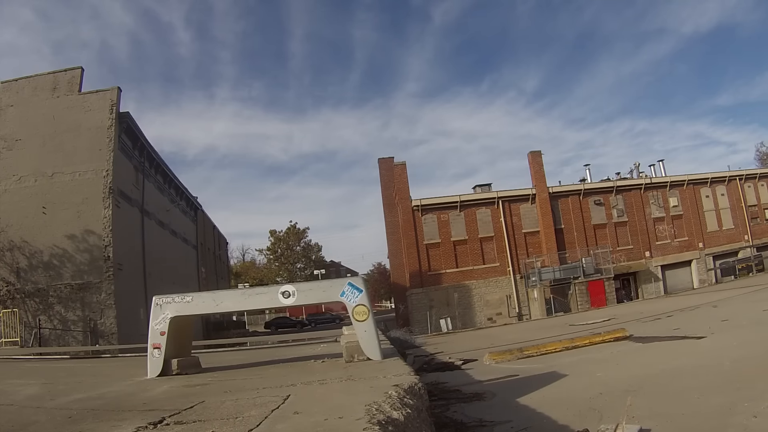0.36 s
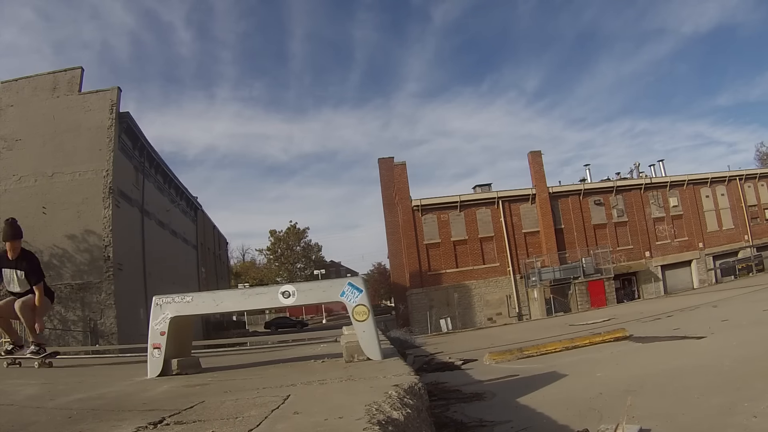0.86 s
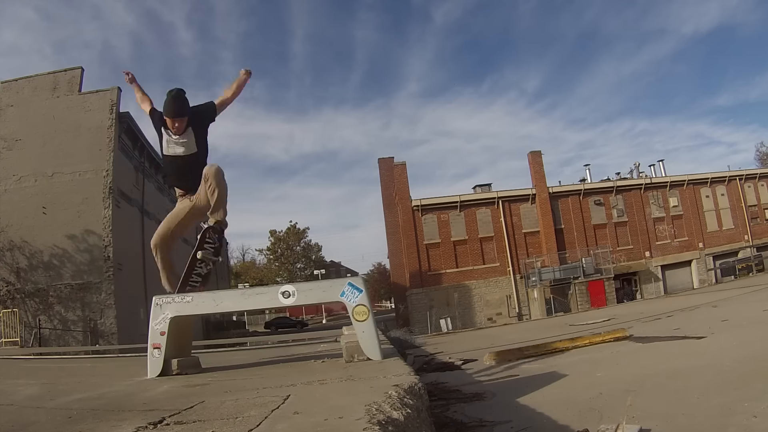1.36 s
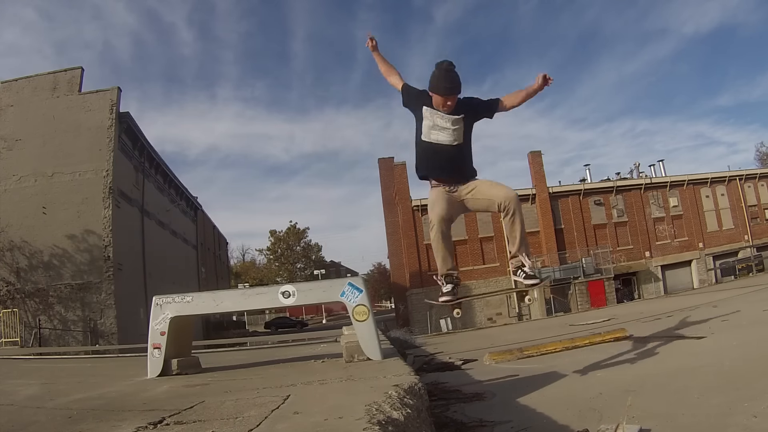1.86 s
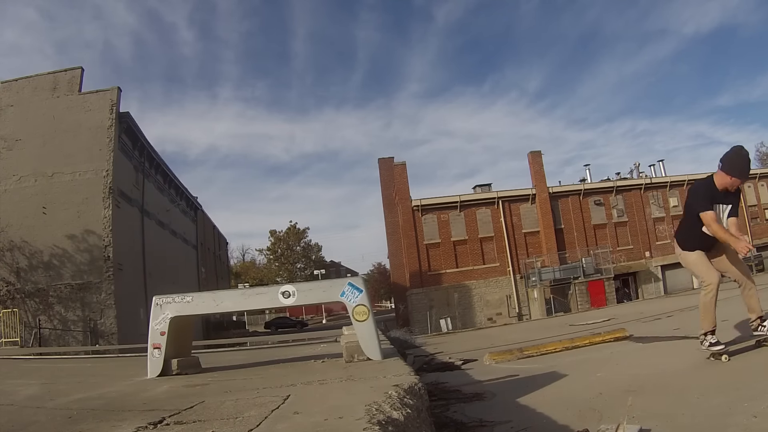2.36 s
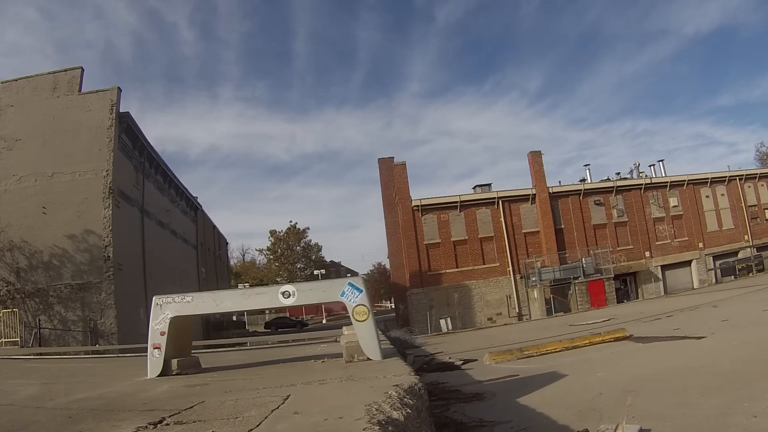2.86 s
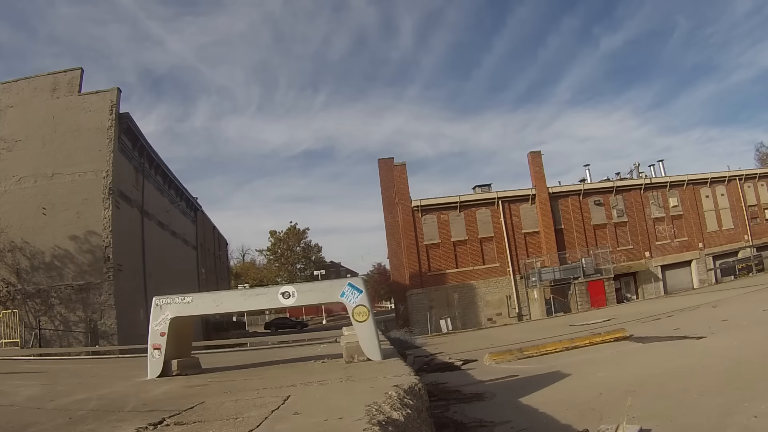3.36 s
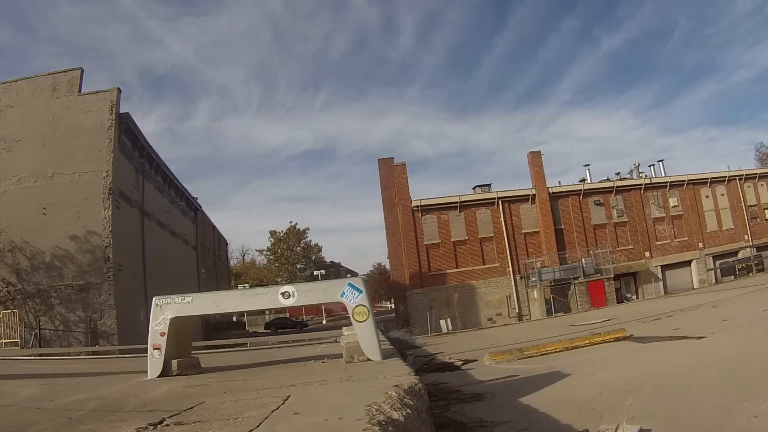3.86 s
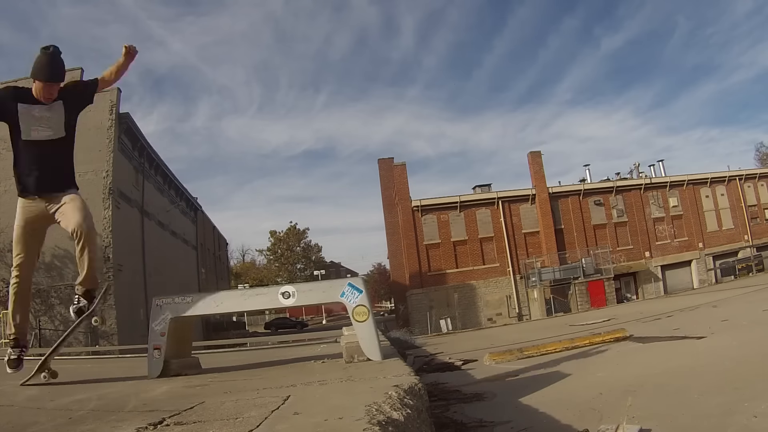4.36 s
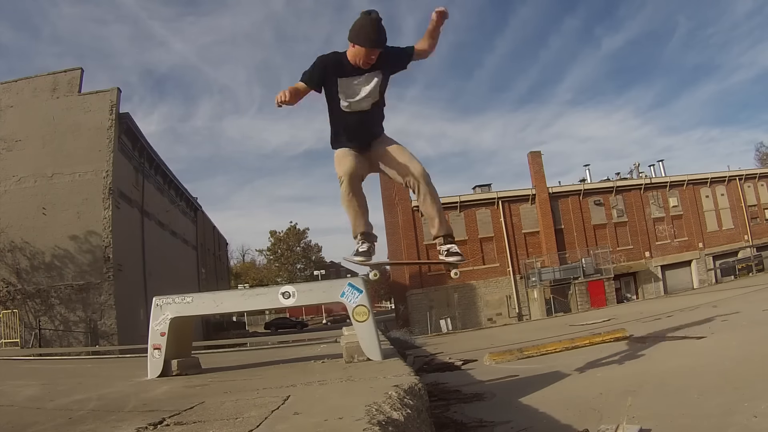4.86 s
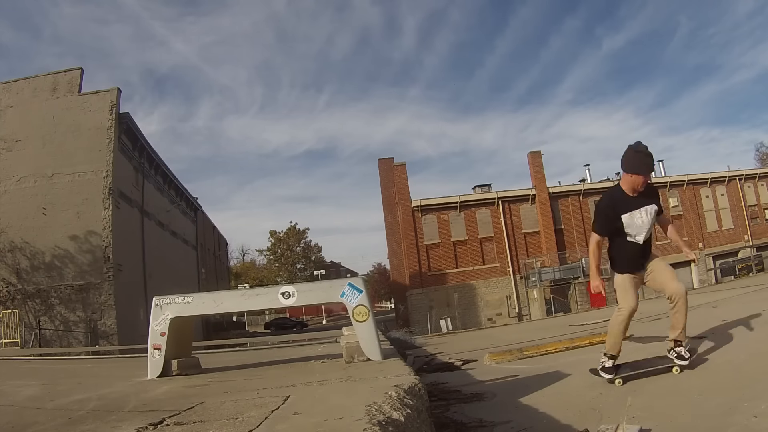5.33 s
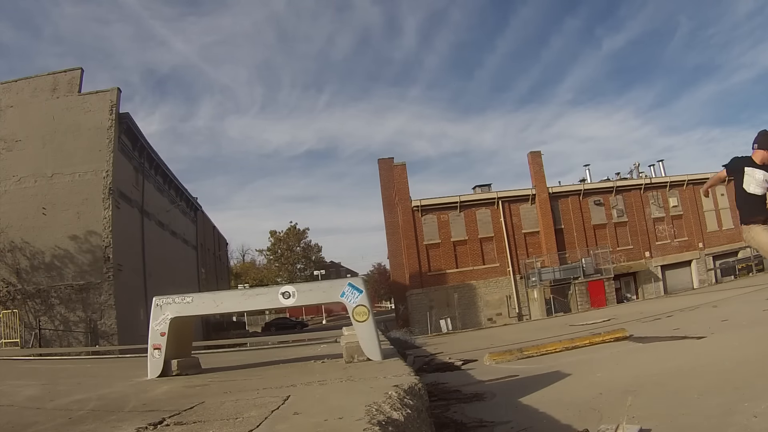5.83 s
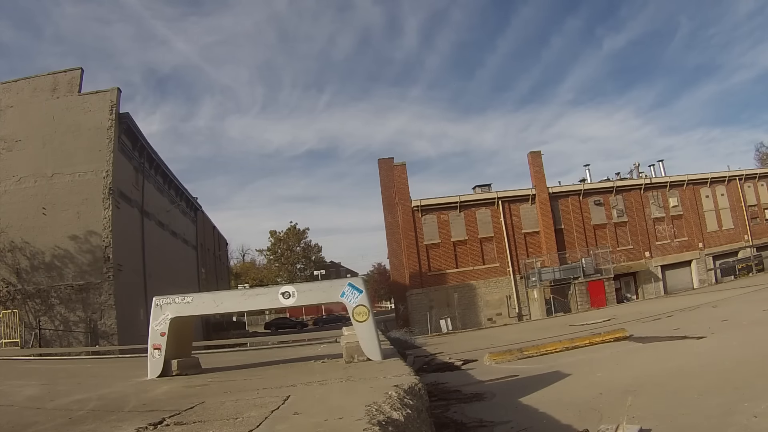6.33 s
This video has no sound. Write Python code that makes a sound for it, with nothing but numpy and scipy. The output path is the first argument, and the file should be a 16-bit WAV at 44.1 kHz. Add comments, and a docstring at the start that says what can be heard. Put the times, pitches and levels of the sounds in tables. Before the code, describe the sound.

Steady wheel rumble and bearing grit over distant traffic hum and low wind rumble. The board snaps, chatters woodenly across a ledge and cracks down on the ground. After a sudden cut, an engine idles behind louder rolling; the board snaps again, slams the ledge, lands twice in quick succession and rolls on. Dull short echoes, a muffled close microphone, and background dipping after the loudest blows.

```python
"""A skateboard on rough concrete in an open lot, two passes: it rolls, pops onto a ledge, lands and rolls off.
Random bumps drive deck drone and bearing grit; blows ring damped modes of deck, trucks and tail, with dull
echoes. Also close by: noise bursts, truck ticks, a faint falling whistle. Far off, town noise and hum; low
wind rumble; in the second pass an idling engine of wavering sines and noise puffs. One microphone in a closed
case hears it boxy, dull and nearly mono; gain control dips the background after loud blows."""
import sys
import numpy as np
from scipy import signal
from scipy.fft import rfft, irfft
from scipy.io import wavfile
from scipy.ndimage import uniform_filter1d, minimum_filter1d

SR = 44100
rng = np.random.default_rng(int(sys.argv[2]) if len(sys.argv) > 2 else 0)


def transcribe(u):
    """Save the signal u as a 16-bit wav file named by the first command-line argument.

    u: samples, shape (n,) or (channels, n), limited to [-1, 1]; the rate is SR.
    q: integer samples, one column per channel.
    """
    v = np.clip(np.atleast_2d(u).T, -1, 1)
    q = np.round(v * 32767).astype(np.int16)
    wavfile.write(sys.argv[1], SR, q)


def ratio(d):
    """dB to gain"""
    e = np.asarray(d, float) / 20
    return 10 ** e


N = 295911

# Far traffic noise: (frequency [Hz], relative density [dB per Hz])
TOWN_SPECTRUM = [(15, -47.5), (40, -14), (70, 1.5), (113, 1.5), (146, -1.5), (174, -4), (360, -0.5),
                 (400, 1.5), (520, -36), (880, -120)]
# Lumpy low rumble, perhaps wind on the microphone case: (time [s], level [dB])
WIND_LEVEL = [(0, -45.5), (1.4, -38), (1.8, -47), (2.8, -39), (3.4, -42), (4.6, -43.5), (5.2, -67.5),
              (5.7, -40), (6.71, -38)]
# Idling engine, overall: (time [s], level [dB])
ENGINE_LEVEL = [(3.33, -21.5), (3.5, -23), (3.57, -22), (3.72, -19), (3.9, -24), (3.97, -22), (4.1, -23.5),
                (4.4, -22.5), (4.72, -32.5), (5.2, -27), (5.6, -35), (5.95, -28.5), (6.3, -24.5),
                (6.71, -26)]
# Engine orders: (multiple of firing rate [1], relative level [dB])
ENGINE_ORDERS = [(4, -14), (5, 1), (7, -13), (9, -5), (10, -11), (12, -9), (15, -12), (16, -12)]
# Wander of the engine's fifth order: (time [s], spread [Hz])
ENGINE_HUNT = [(3.33, 4.0), (3.55, .5), (4.5, .7), (5.9, 3.0), (6.71, 8.0)]
# Exhaust noise: (frequency [Hz], relative density [dB per Hz])
EXHAUST_SPECTRUM = [(35, -31), (60, -25), (113, 1), (172, -8), (206, 0), (239, -8), (274, 1), (648, -17.5),
                    (900, -30.5), (1170, -48), (1980, -120)]
# Falling whistle in two notes:
# (start [s], length [s], from frequency [Hz], to frequency [Hz], relative level [dB])
WHISTLE_NOTES = [(3.0, .205, 1645, 1495, -40.5), (3.225, .095, 1420, 1395, -45)]
# Drone of the wheels on concrete, before gain control: (time [s], level [dB])
ROLL_LEVEL = [(0.0, -28), (0.65, -26.5), (0.95, -26), (1.3, -25.5), (1.55, -27.5), (1.8, -28.5), (2.0, -29),
              (2.5, -27.5), (2.8, -26), (3.3, -27.5), (3.33, -24.5), (3.9, -24), (4.35, -22), (4.7, -25),
              (4.85, -18.5), (5.05, -26.5), (5.5, -27), (6.2, -26), (6.71, -26)]
# Deck drone under the rolling wheels: (frequency [Hz], relative density [dB per Hz])
DRONE_SPECTRUM = [(110, -20.5), (180, -1), (264, -1), (360, -5.5), (433, 1.5), (490, -1), (634, 1.5),
                  (764, -2), (1270, -24), (1500, -36), (1950, -39.5), (3300, -120)]
# Bearing grit, also mixed into the exhaust: (frequency [Hz], relative density [dB per Hz])
GRIT_SPECTRUM = [(650, -22.5), (1100, -10.5), (1500, -0.5), (2130, -2), (2900, -10), (3700, -13),
                 (4600, -18), (5400, -17.5), (6500, -27.0), (7600, -60), (16000, -90)]
# Loose trucks jiggling on the coarse ground: (time [s], level [dB])
JIGGLE_LEVEL = [(0, -68.5), (1.3, -68), (2.3, -52), (3.3, -65), (3.33, -54), (3.6, -54), (3.9, -49.5),
                (4.05, -56), (4.4, -51.5), (4.75, -48), (5.4, -58.5), (6.2, -67), (6.71, -60)]
# Bursts of coloured noise: scuffs, ticks, bright edges of landings, faint treble puffs:
# (start [s], relative level [dB], centre frequency [Hz], length [s])
NOISE_BURSTS = [(0.395, -55, 5000, 0.04), (0.403, -40, 1610, 0.025), (0.49, -56, 5000, 0.016),
                (0.508, -56, 4900, 0.035), (1.702, -48, 4800, 0.035), (1.713, -41, 4700, 0.012),
                (1.702, -45, 3300, 0.022), (1.702, -51, 6600, .03), (1.747, -55.5, 6400, 0.033),
                (2.1468, -38.5, 9560, .003), (2.15, -46, 9400, 0.036), (2.137, -54, 12600, .025),
                (2.84, -70, 9500, 0.19), (3.07, -72, 8500, .09), (3.285, -65, 8500, .06),
                (3.785, -57, 4700, 0.05), (3.795, -63, 10020, .03), (3.945, -43, 2800, 0.009),
                (3.963, -45, 2800, .01), (3.9, -54, 2700, .12), (4.527, -42, 5800, .005),
                (5.3028, -33, 4300, .006), (5.324, -56, 11750, 0.04), (5.333, -41, 4300, 0.03),
                (5.76, -60, 5130, 0.05), (5.774, -65.5, 11030, 0.046), (6.323, -68, 9470, 0.14),
                (6.407, -52, 4780, 0.01)]
# The tail snaps on the ground: (time [s], relative level [dB])
TAIL_SNAPS = [(1.3886, -17.5), (4.5132, -21)]
# Modes of the tail: (frequency [Hz], relative level [dB], t60 [s])
TAIL_MODES = [(535, 3, .035), (750, 10, .03), (1150, -5, .025), (1450, 1, .03), (1840, -3, .03),
              (2420, -9, .02), (3080, -2, .018), (3500, 0, .016), (4560, -3, .02), (5690, -8, .02),
              (6250, -13, .015)]
# Blows of board on ledge and ground: (time [s], relative deck level [dB],
# relative crack level [dB], chatter length [s], centre of deck ring [Hz])
BLOWS = [(0.389, -7, -45, 0.011, 600), (0.407, 0, -44, 0.0055, 625), (0.408, -22.5, -48, 0.016, 260),
         (0.491, -6.5, -39.5, 0.0021, 460), (0.507, -5.5, -42, 0.0035, 540), (1.149, -5, -50, .001, 680),
         (1.389, -7, -19, 0.011, 560), (1.631, -2.5, -35, 0.01, 750), (1.642, -12, -25, 0.002, 520),
         (1.645, 6.5, -26, 0.0039, 480), (1.66, 6, -31, 0.0036, 566), (1.663, 9, -23.5, 0.009, 580),
         (1.676, 12.5, -24, 0.006, 736), (1.689, 3, -30.5, 0.022, 575), (1.716, -6, -35, 0.013, 627),
         (1.733, -2, -37, 0.0039, 675), (1.786, -9, -46, 0.017, 620), (2.147, 2, -17, 0.0027, 513),
         (2.152, 11.5, -16, 0.0078, 638), (2.168, 1, -18.5, 0.004, 480), (2.176, 1, -26.5, 0.0042, 642),
         (3.315, -11.5, -31.5, 0.0016, 408), (3.333, -22, -53, 0.0046, 420), (3.345, -30, -38, 0.0033, 397),
         (3.576, 1, -35, 0.0012, 457), (3.902, -16, -46, 0.0044, 405), (3.951, -24, -36.5, 0.001, 640),
         (3.967, -16, -42, 0.00075, 637), (4.171, -6, -46, .001, 646), (4.248, -8, -46.5, .001, 650),
         (4.306, -20, -46.5, .001, 650), (4.5135, -2.5, -23.5, 0.014, 640),
         (4.536, -4.5, -30.5, 0.0016, 373), (4.756, 1, -24.5, 0.0012, 760), (4.7588, 9.5, -18, 0.0011, 730),
         (4.7628, 19.5, -13.5, 0.0011, 650), (4.773, 5.5, -27, 0.017, 740), (4.805, 2.5, -30.5, 0.02, 650),
         (5.3028, 10.5, -17.5, 0.0059, 507), (5.332, 9.5, -17.5, 0.0066, 680),
         (5.355, -2, -28.5, 0.0056, 493)]
# Modes of the deck: (frequency [Hz], relative level [dB], t60 [s])
DECK_MODES = [(405, 3.5, 0.016), (490, -6.5, 0.012), (550, 4.5, 0.016), (680, -7, 0.045),
              (758.6, -7, 0.052), (890, 5.5, 0.0074), (1080, -9, 0.045), (1130, -10, 0.042)]
# Modes of axles and bolts, before any detuning: (frequency [Hz], relative level [dB], t60 [s])
TRUCK_MODES = [(1430, 0, 0.012), (1860, 3, 0.012), (2380, 2, 0.009), (2950, -1, 0.006), (4130, -3, 0.007),
               (4650, -2, 0.007), (5400, 0.5, 0.0035), (6550, -1, 0.0027), (7760, -4.5, 0.004),
               (10500, -17.5, 0.0018)]
# Modes of the low thud: (frequency [Hz], relative level [dB], t60 [s])
THUD_MODES = [(191.7, -9, 0.14), (244, 1.5, 0.029), (306, -3.5, 0.088)]
# Each blow rings the trucks in one of three tunings, drawn at random: (frequency factor [1])
TRUCK_TUNINGS = [.93, 1, 1.07]

SECOND_PASS_S, STEP_S = 3.318, .008   # the second pass starts abruptly; time a level takes to step
TOWN_DB, TOWN_SECOND_DB = -32, -29   # traffic noise in the first and second pass
HUM_HZ, HUM_DB, HUM_STEP_S, HUM_AFTER_DB = 148.8, -32.5, 4.2, -33.5   # upper hum line; steps 1 dB lower
FIFTH_HZ, SAG_HZ_PER_S = 114.3, .6   # fifth engine order at the start of the second pass, and its sag
GRIT_DB, GRIT_FOLLOWS, ROLL_MEAN_DB = -49, 1.13, -26   # grit at mean roll; its share of the drone's swing
JIGGLES_PER_S = 700.0   # middle rate of the truck ticks
TOUCHES, TOUCH_S = 10, .0045   # touches in a blow and their spacing
DECK_LOSS_DB, CRACK_LOSS_DB = 0.3, 5.5   # loss per touch
CRACK_HZ = 1800   # centre of the trucks' rattle
THUD_DB, THUD_PER_OCTAVE_DB = -20.5, 21.5   # thud under a ring at 600 Hz; lower rings thud more
LIMIT_DB, ATTACK_S, HOLD_S, RELEASE_DB_PER_S = -6.5, 0.0011, .065, 10.5   # gain control


def in_time(rows):
    """Columns joined by straight lines, one value per sample."""
    s, *columns = np.transpose(rows)
    return [np.interp(np.arange(N) / SR, s, c) for c in columns]


def step(at_s, before_db, after_db):
    """One level, then quickly another."""
    return np.interp(np.arange(N) / SR, [at_s, at_s + STEP_S], [before_db, after_db])


def rms_one(x):
    """Scale to rms 1."""
    return x / np.sqrt(np.mean(x ** 2) + 1e-20)


def drift(rate_hz):
    """Slow random wander of spread 1: low-passed noise, drawn every 40 samples."""
    r = np.exp(-2 * np.pi * rate_hz * 40 / SR)
    noise = rng.standard_normal(N // 40 + 2002)
    slow = signal.lfilter([1], [1, -2 * r, r * r], noise)[2000:]
    return np.interp(np.arange(N) / 40, np.arange(len(slow)), rms_one(slow))


def colour(x, spectrum):
    """Weight a signal by a spectrum of (Hz, dB) points; rms 1."""
    hz, db = np.transpose(spectrum)
    bins_hz = np.fft.rfftfreq(N, 1 / SR) + 1
    weight = ratio(np.interp(np.log(bins_hz), np.log(hz), db))
    return rms_one(irfft(rfft(x) * weight, N))


def band(x, low_hz, high_hz):
    """Butterworth band-pass."""
    return signal.sosfilt(signal.butter(2, [low_hz, high_hz], "band", fs=SR, output="sos"), x)


def ring(force, hz, t60):
    """A damped resonator: a unit click sets a sine of height 1 ringing."""
    r, w = ratio(-60 / (t60 * SR)), 2 * np.pi * hz / SR
    return signal.lfilter([0, np.sin(w)], [1, -2 * r * np.cos(w), r * r], force + 1e-18)


def strike(times, sizes, modes, pushes):
    """Every blow pushes every mode with a size and sense of its own."""
    out = np.zeros(N)
    for m, (hz, mode_db, t60) in enumerate(modes):
        force = np.zeros(N + pushes.shape[1])
        for at, size, push in zip(np.round(times * SR).astype(int), sizes[:, m], pushes):
            force[at:at + len(push)] += size * push
        out += ratio(mode_db) * ring(force[:N], hz, t60)
    return out


def town():
    """Far traffic noise with two slightly wavering hum lines an octave apart."""
    low_turn = np.pi * np.cumsum(HUM_HZ + 0.71 * drift(1.8)) / SR
    waver = drift(2.5)
    hum_db = step(HUM_STEP_S, HUM_DB, HUM_AFTER_DB) + 1.5 * waver
    low_line = ratio(-4.5 + 2.75 * waver) * np.sin(low_turn)
    hum = ratio(hum_db) * (np.sin(2 * low_turn) + low_line)
    traffic_db = step(SECOND_PASS_S, TOWN_DB, TOWN_SECOND_DB)
    return ratio(traffic_db) * colour(rng.standard_normal(N), TOWN_SPECTRUM) + hum


def wind():
    """Lumpy low rumble: noise in a narrow band around 24 to 56 Hz."""
    rumble = band(band(rng.standard_normal(N), 36.0, 52.0), 24.0, 56.0)
    return ratio(in_time(WIND_LEVEL)[0]) * rms_one(rumble)


def engine():
    """Low orders as wavering sines, plus a puff of exhaust noise at every firing."""
    since_s = np.arange(N) / SR - SECOND_PASS_S
    fifth_hz = FIFTH_HZ - SAG_HZ_PER_S * since_s + in_time(ENGINE_HUNT)[0] * drift(5.05)
    turn = 2 * np.pi * np.cumsum(fifth_hz / 5) / SR
    orders = np.zeros(N)
    for k, db in ENGINE_ORDERS:
        level = ratio(db - 0.5 + drift(6.0))
        orders += level * np.sin(k * turn + 0.35 * drift(1.1))
    # each puff starts at once and decays through its cycle
    cycle = turn / (2 * np.pi) % 1
    puffs = np.exp(-cycle / 1.1) * ratio(0.47 * drift(7.7)) * rng.standard_normal(N)
    exhaust = ratio(-2.0) * colour(puffs, EXHAUST_SPECTRUM) + ratio(-32.0) * colour(puffs, GRIT_SPECTRUM)
    level_db = in_time(ENGINE_LEVEL)[0] + step(SECOND_PASS_S, -70, 0)
    return ratio(level_db) * (orders + exhaust)


def whistle():
    """A near sine gliding down in each note, its pitch and level slightly unsteady."""
    out = np.zeros(N)
    for s, length, from_hz, to_hz, db in WHISTLE_NOTES:
        part = np.clip((np.arange(N) / SR - s) / length, 0, 1)
        hz = from_hz + (to_hz - from_hz) * part + 3 * drift(15.0)
        swell = np.sin(np.pi * part ** .8) ** .5
        out += ratio(db - 1.5) * swell * np.sin(2 * np.pi * np.cumsum(hz) / SR)
    return out * ratio(1.5 * drift(20.0))


def walls(x):
    """A few dull echoes from the ground, the ledge and the buildings."""
    dull, out = signal.lfilter([.15], [1, -.85], x), np.zeros(N)
    for lag_s, echo_db in [(.012, -13.5), (.027, -13.5), (.052, -27), (.085, -25), (.13, -25), (.19, -40.5)]:
        lag = round(lag_s * SR)
        out[lag:] += ratio(echo_db) * dull[:-lag]
    return out


def noise_bursts():
    """Each scuff, tick, landing edge or puff is a swell of grainy noise in one frequency band."""
    out, t = np.zeros(N), np.arange(int(.2 * SR)) / SR
    shape = (len(NOISE_BURSTS), len(t))
    grains = rng.standard_normal(shape) * rng.exponential(1, shape)
    broken = ratio(4.5 * drift(30.0))   # the level flickers, as when friction catches and slips
    for (s, db, hz, length), grain in zip(NOISE_BURSTS, grains):
        at = round(s * SR)
        swell = np.sin(np.pi * np.clip(t / length, 0, 1) ** .6) * broken[at:at + len(t)]
        wide = 1.2 if hz < 8000 else 1.4
        low_hz, high_hz = hz / wide, hz * wide
        coloured = rms_one(band(band(grain, low_hz, high_hz), low_hz, high_hz))
        out[at:at + len(t)] += ratio(db) * swell * coloured
    return out


def jiggle():
    """Light uneven ticks, each ringing one of the six lowest modes of the trucks."""
    heights = ratio(3 * np.minimum(rng.exponential(1, N), 4))
    sizes = heights * (rng.random(N) < JIGGLES_PER_S * ratio(3 * drift(8.0)) / SR)
    dealt = rng.integers(0, 6, N)   # which mode each tick rings
    ticks = np.zeros(N)
    for k, (hz, db, t60) in enumerate(TRUCK_MODES[:6]):
        mode_db = db - 4.9 * np.log2(hz / 2500) ** 2
        ticks += ratio(mode_db) * ring(sizes * (dealt == k), hz, .5 * t60)
    return ratio(in_time(JIGGLE_LEVEL)[0]) * rms_one(band(ticks, 900.0, 5500.0))


def wheels(drone_db, grit_db, bumps_per_s, spread_db):
    """Bumps in the concrete kick the wheels; one rough ground feeds both deck drone and bearing grit."""
    sizes = ratio(spread_db * np.minimum(rng.exponential(1, N), 4)) * rng.choice([-1, 1], N)
    patches = ratio(1.8 * drift(25.0))   # coarser and smoother concrete under all four wheels
    kicks = rms_one(sizes * (rng.random(N) < bumps_per_s / SR))
    ground = patches * (kicks + 1.9 * rng.standard_normal(N))
    return ratio(drone_db) * colour(ground, DRONE_SPECTRUM) + ratio(grit_db) * colour(ground, GRIT_SPECTRUM)


def tail():
    """A clean hard snap, then a weaker second touch, rings the modes of the tail."""
    s, db = np.transpose(TAIL_SNAPS)
    scatter_db = 1.5 * rng.standard_normal((len(s), len(TAIL_MODES)))
    sizes = ratio(db[:, None] + scatter_db) * (-1) ** np.arange(len(TAIL_MODES))
    push = np.zeros((len(s), round(.0045 * SR)))
    push[:, [0, -1]] = 1, .4
    return strike(s, sizes, TAIL_MODES, push)


def touches():
    """Every blow chatters, a run of weakening touches: (s, deck dB, crack dB, thud dB, centre Hz)."""
    late = rng.uniform(-.25, .25, (len(BLOWS), TOUCHES))
    rows = []
    for (s, deck_db, crack_db, length, hz), jitter in zip(BLOWS, late):
        for k in range(TOUCHES):
            over_db = 30 * np.clip(k - length / TOUCH_S, 0, 4)   # steep loss once the chatter ends
            ring_db = deck_db - DECK_LOSS_DB * k - over_db
            rattle_db = crack_db - CRACK_LOSS_DB * k - over_db
            thud_db = ring_db + THUD_DB - THUD_PER_OCTAVE_DB * np.log2(hz / 600)
            at_s = s + TOUCH_S * (k + jitter[k] * (k > 0))
            rows.append((at_s, ring_db, rattle_db, thud_db, hz))
    return rows


def board():
    """A knock rings the deck near where it is hit and thuds below; the loose trucks rattle on for a moment."""
    s, deck_db, crack_db, thud_db, deck_hz = np.transpose(touches())[:, :, None]
    times = s[:, 0]
    scatter = rng.standard_normal((len(s), 3, len(TRUCK_MODES)))
    sense = np.where(rng.random((len(s), len(DECK_MODES))) < .15, 1, -1)
    t = np.arange(int(.08 * SR)) / SR
    rattle = rng.standard_normal((len(s), len(t))) * np.exp(-t / 0.008)
    rattle *= 1 + 1.5 * np.exp(-t / 0.0012)   # hardest at its start
    rattle /= np.sqrt(np.sum(rattle ** 2, axis=1, keepdims=True))
    knock = np.ones((len(s), 1))
    # modes far from the centre of a blow are driven less
    deck_db = deck_db - 11.5 - 27.6 * np.log2(np.array(DECK_MODES)[:, 0] / deck_hz) ** 2
    crack_db = crack_db + 0.5 - 2.16 * np.log2(np.array(TRUCK_MODES)[:, 0] / CRACK_HZ) ** 2
    deck_sizes = sense * ratio(deck_db + 1.25 * scatter[:, 0, :len(DECK_MODES)])
    deck = strike(times, deck_sizes, DECK_MODES, knock)
    thud_sizes = -ratio(thud_db + 2.5 * scatter[:, 1, :len(THUD_MODES)])
    thud = strike(times, thud_sizes, THUD_MODES, knock)
    truck_sizes = (-1) ** np.arange(len(TRUCK_MODES)) * ratio(crack_db + 3.75 * scatter[:, 2])
    tuning = np.repeat(rng.integers(0, len(TRUCK_TUNINGS), len(BLOWS)), TOUCHES)
    trucks = np.zeros(N)
    for k, factor in enumerate(TRUCK_TUNINGS):
        mine = tuning == k
        tuned = np.array(TRUCK_MODES) * [factor, 1, 1]
        trucks += strike(times[mine], truck_sizes[mine], tuned, rattle[mine])
    # each part radiates only in its own range
    low = band(deck, 230.0, 1100.0) + band(thud, 170.0, 570.0)
    soft = signal.sosfilt(signal.butter(3, 1300.0, fs=SR, output="sos"), low)
    return soft + band(trucks, 1100.0, 14500.0)


def scene():
    """One sound field at the single microphone port."""
    drone_db, = in_time(ROLL_LEVEL)
    grit_db = GRIT_DB + GRIT_FOLLOWS * (drone_db - ROLL_MEAN_DB)
    background = town() + wind() + engine() + whistle()
    rolling = wheels(drone_db, grit_db, bumps_per_s=1500.0, spread_db=1.0) + jiggle()
    blows = board() + tail()
    mono = background + rolling + noise_bursts() + blows + walls(blows)
    return np.array([mono, mono])


def gain_control(x):
    """Loudness over the limit pulls the gain down fast; it holds, then creeps back."""
    power = uniform_filter1d(np.mean(x ** 2, axis=0), int(.004 * SR))
    over_db = np.maximum(10 * np.log10(np.abs(power) + 1e-12) - LIMIT_DB, 0)
    hold = int(HOLD_S * SR) + 1
    held_db = -minimum_filter1d(-over_db, hold, origin=(hold - 1) // 2)
    # the running maximum on a rising ramp lets the cut fall steadily
    ramp_db = RELEASE_DB_PER_S * np.arange(N) / SR
    cut_db = np.maximum.accumulate(held_db + ramp_db) - ramp_db
    r = np.exp(-1 / (ATTACK_S * SR))
    return x * ratio(-signal.lfilter([1 - r], [1, -r], cut_db))


def roll_off(x):
    """The treble ends steeply here."""
    return signal.sosfilt(signal.butter(12, 14700, fs=SR, output="sos"), x)


def record(dry):
    """Gain control, then rounded peaks; the right is a little stronger than the left from 740 to 8000 Hz."""
    rounded = 1.1 * np.tanh(gain_control(dry) / 1.1)
    band_filter = signal.butter(2, [740.0, 8000.0], "band", fs=SR, output="sos")
    middle = signal.sosfiltfilt(band_filter, rounded)
    mix = rounded + .07 * middle * [[-1], [1]]
    return roll_off(mix)


dry = scene()
out = record(dry)
transcribe(out)
```